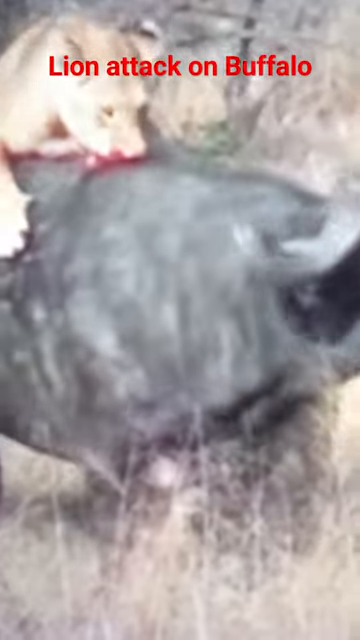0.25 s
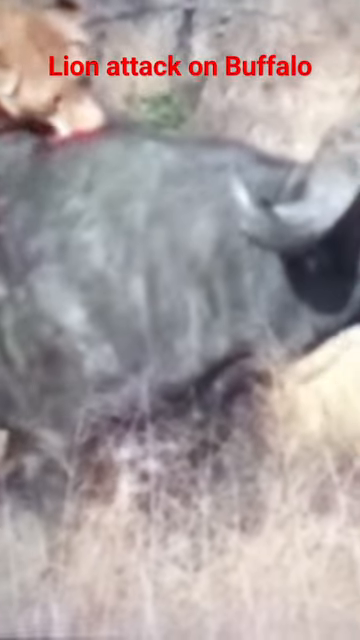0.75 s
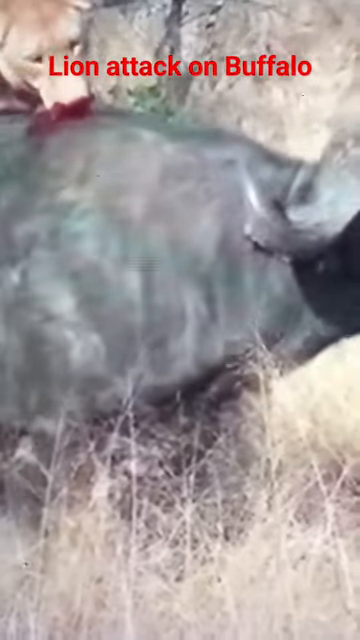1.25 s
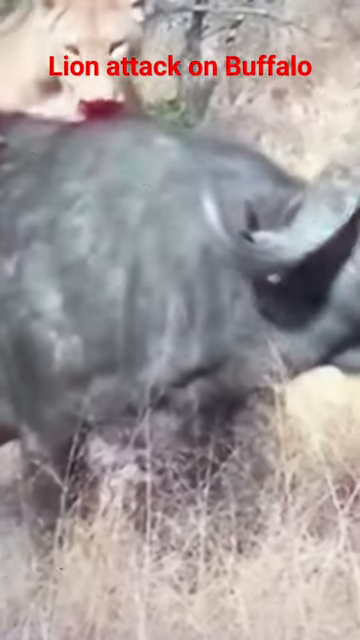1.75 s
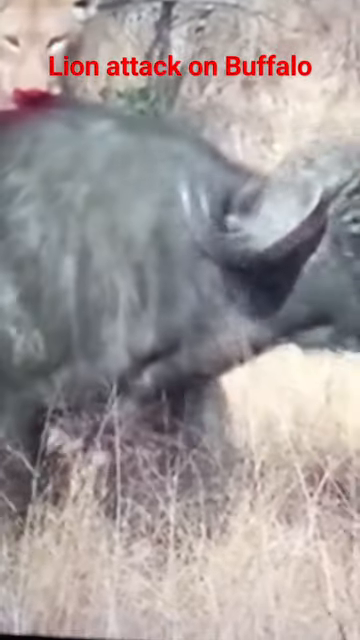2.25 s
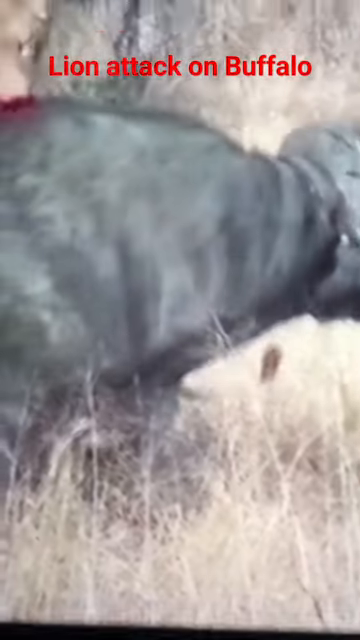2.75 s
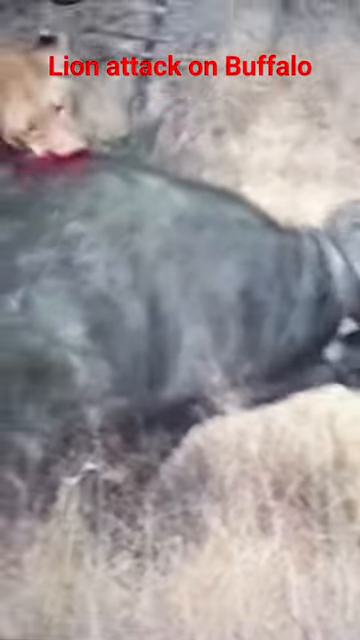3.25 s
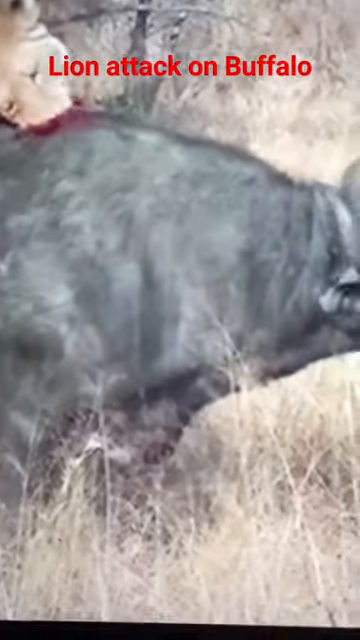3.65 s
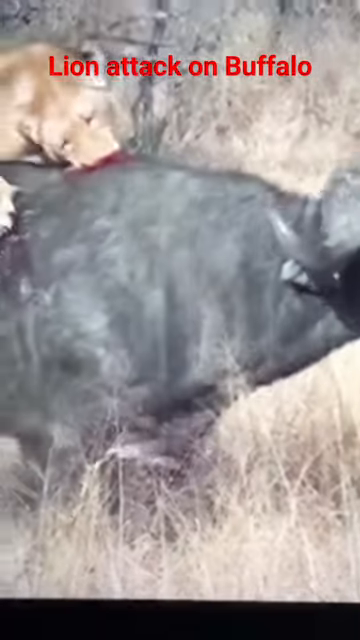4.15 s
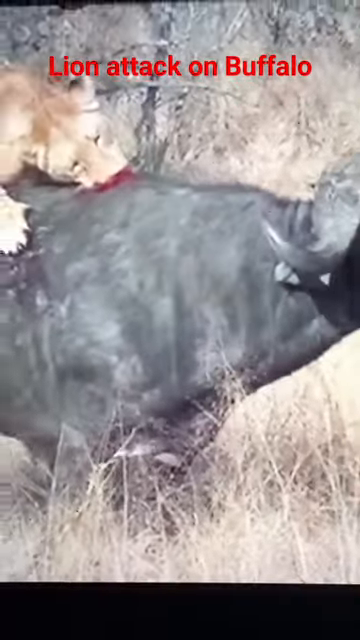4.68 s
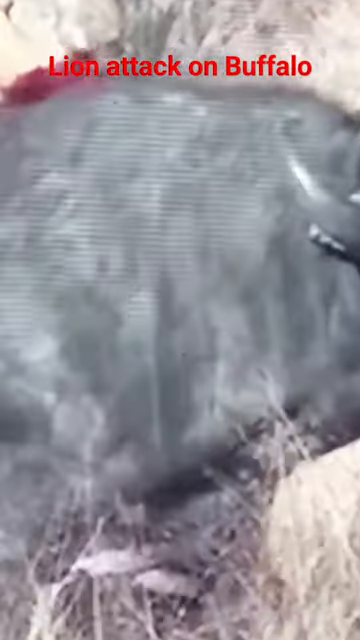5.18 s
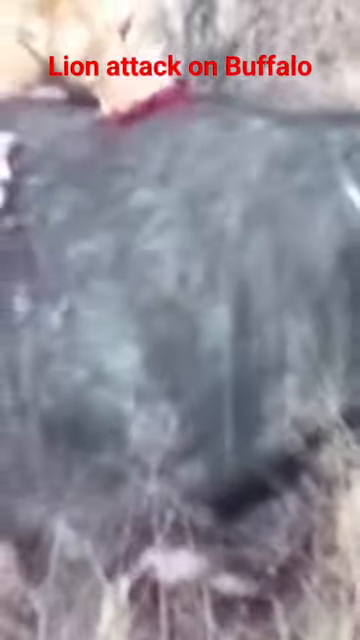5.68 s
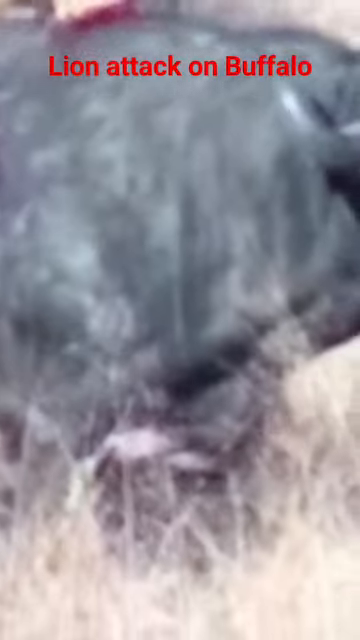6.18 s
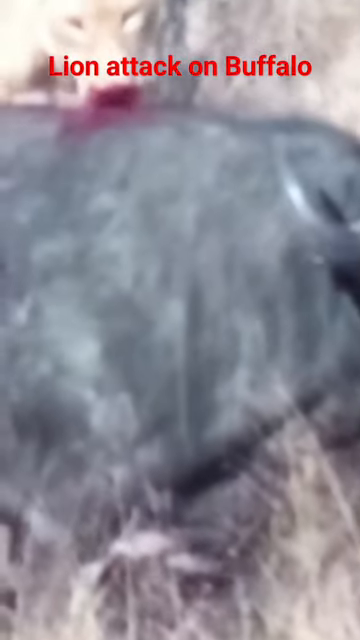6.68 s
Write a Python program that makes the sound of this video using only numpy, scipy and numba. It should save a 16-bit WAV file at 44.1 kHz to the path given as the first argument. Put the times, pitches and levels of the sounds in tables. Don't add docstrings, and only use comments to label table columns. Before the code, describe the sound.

A buffalo bellows twice in hoarse, guttural distress, each call ending in a gasp, with camera shutters rattling, creaks, a snort and rustling dry grass.

```python
import sys
import numpy as np
from scipy import signal
from scipy.fft import rfft, irfft
from scipy.io import wavfile
from scipy.ndimage import uniform_filter1d
from numba import njit

SR = 44100
rng = np.random.default_rng(int(sys.argv[2]) if len(sys.argv) > 2 else 0)


def log_audio(samples):
    frames = np.atleast_2d(samples).T
    limited = np.clip(frames, -1, 1)
    pcm = np.round(limited * 32767).astype(np.int16)
    wavfile.write(sys.argv[1], SR, pcm)


def nominal_scale(level):
    x = np.asarray(level, float) / 20
    return 10 ** x


N = 305524


def seconds():
    return np.arange(N) / SR


def rms_one(x):
    return x / np.sqrt(np.mean(x ** 2) + 1e-20)


def in_time(rows, outside=None):
    s, *columns = np.transpose(rows)
    return [np.interp(seconds(), s, c, outside, outside) for c in columns]


def spans_db(tables):
    return sum(nominal_scale(in_time(rows, outside=-200)[0]) for rows in tables)


def bells(rows):
    return [np.exp(-((seconds() - s) / width) ** 2) for s, width, *_ in rows]


def drift(rate):
    r = np.exp(-2 * np.pi * rate / SR)
    return rms_one(signal.lfilter([1], [1, -2 * r, r * r], rng.standard_normal(N + SR))[SR:])


@njit
def resonate(x, hz, r, sr):
    out = np.zeros(len(x))
    for i in range(2, len(x)):
        driven = (1 - r * r) / 2 * (x[i] - x[i - 2])
        out[i] = driven + 2 * r * np.cos(2 * np.pi * hz[i] / sr) * out[i - 1] - r * r * out[i - 2]
    return out


def bands(x, modes, order=1):
    out = 0
    for k, (hz, width, db) in enumerate(modes):
        rung = x + 1e-18
        for _ in range(order):
            rung = resonate(rung, hz + np.zeros(N), np.exp(-np.pi * width / SR), SR)
        out = out + (-1) ** k * nominal_scale(db) * rung
    return out


def shaped_noise(spectrum):
    hz, db = np.transpose(spectrum)
    grid = np.log(np.arange(1, N // 2 + 2) * SR / N)
    gain = nominal_scale(np.interp(grid, np.log(hz), db, -90, -90))
    return rms_one(irfft(rfft(rng.standard_normal(N)) * gain, N))


def steep(x, kind, hz, order=4):
    return signal.sosfilt(signal.butter(order, hz, kind, fs=SR, output="sos"), x)


# f/Hz, width/Hz, level/dB
RUSTLE_BANDS = [(670, 530, 2.5), (1270, 290, -14), (1500, 850, -8.5), (2367, 600, 7), (2790, 900, -1),
                (3350, 610, -0.5), (3910, 500, -0.5), (4580, 560, -20.5), (5400, 440, -19.5),
                (6500, 240, -60.5), (7170, 1700, -40.5), (8360, 280, -37.5)]
# f/Hz, width/Hz, level/dB
BRUSH_BANDS = [(5220, 880, 7), (7740, 2000, -7.5)]
# f/Hz, level/dB per Hz
ROOM_HUM = [(21, -32.5), (36, -20), (65, -14), (172, -3.5), (205, -5.5), (231, -11), (401, -20.5),
            (429, -28.5), (463, -9), (500, -26), (650, -43.5), (1100, -120)]
# f/Hz, level/dB per Hz
HISS = [(250, 0.5), (1000, 10), (3000, -7.5), (6000, -30), (10000, -22), (15000, -29), (16000, -31)]
# centre t/s, width t/s, rustle rise level/dB, brushing rise level/dB
STIRS = [
    (2.08, 0.13, 5, 7),
    (2.5, 0.24, 9.5, 8),
    (6.2, 0.38, 5.5, 9),
    (6.6, 0.44, 2.5, 3.5),
    (6.95, 0.23, 7.5, 9),
]
RUSTLE_DB, BRUSH_DB, HUM_DB, HISS_DB = -40.5, -67.5, -58, -56.5
RUSTLE_SHIFT_DB, HUM_SHIFT_DB, SHIFT_S = 3, -3, .1


def background():
    rustle = rms_one(bands(rng.standard_normal(N) * nominal_scale(2.0 * drift(17)), RUSTLE_BANDS, order=2))
    brush = rms_one(bands(rng.standard_normal(N) * nominal_scale(2.7 * drift(23)), BRUSH_BANDS, order=2))
    hum = steep(shaped_noise(ROOM_HUM), "high", 30, order=6) * nominal_scale(0.35 * drift(16))
    rustle_db, brush_db = sum(np.outer(db, bell) for (_, _, *db), bell in zip(STIRS, bells(STIRS)))
    calling = uniform_filter1d(1. * (spans_db(EFFORT) > 1e-6), int(SHIFT_S * SR))
    out = nominal_scale(RUSTLE_DB - 10.0 + rustle_db + RUSTLE_SHIFT_DB * calling) * rustle
    out += nominal_scale(BRUSH_DB + brush_db) * brush
    out += nominal_scale(HUM_DB + HUM_SHIFT_DB * calling) * hum
    return out + nominal_scale(HISS_DB) * shaped_noise(HISS)


# t/s, length t/s, start f/Hz, end f/Hz, level/dB
CHIRPS = [
    (5.63, .05, 7200, 6500, -72),
    (6.685, .05, 6600, 6750, -63),
    (6.73, .045, 5450, 5050, -52),
]


def chirps():
    out = np.zeros(N)
    for s, length, start_hz, end_hz, db in CHIRPS:
        size = int(length * SR)
        glide = np.cumsum(np.linspace(start_hz, end_hz, size)) / SR
        out[round(s * SR):][:size] += nominal_scale(db) * np.hanning(size) * np.sin(2 * np.pi * glide)
    return out


# t/s, peak level/dB
SHUTTERS = [
    [(2.228, -32.5), (2.263, -34.5), (2.275, -34), (2.301, -29), (2.321, -29.5), (2.352, -31), (2.376, -36),
     (2.409, -29.5), (2.426, -46)],
    [(5.876, -31), (5.905, -32), (5.92, -32.5), (5.948, -25.5), (5.966, -33), (6.002, -27.5),
     (6.025, -32.5), (6.058, -26.5), (6.078, -28.5), (6.108, -29), (6.122, -40), (6.151, -25.5),
     (6.167, -31), (6.201, -27), (6.259, -27.5)],
    [(3.132, -41), (3.203, -39.5), (3.257, -42), (4.284, -39), (4.357, -40), (4.41, -39), (4.465, -46)],
]
# t/s, peak level/dB
SMACKS = [
    (2.6136, -36),
    (2.676, -44),
    (2.71, -42),
    (2.721, -43),
    (2.802, -57),
    (5.081, -45),
    (5.099, -40.5),
    (5.12, -61),
]
# f/Hz, width/Hz, level/dB
SNAP_EDGE = [(4220, 450, -6), (5420, 1030, -1), (6570, 640, -24), (7490, 1060, -10), (9270, 910, -38)]
# f/Hz, width/Hz, level/dB
SNAP_BODY = [(736, 245, 7.5), (1474, 420, 3.5), (2140, 550, 10), (2870, 580, 9)]
SHUTTER_BODY_DB, SHUTTER_MS = (11, 6, -9), 3.48
SMACK_BODY_DB, SMACK_MS = 27, 3.2


def snaps():
    edge, body, t = np.zeros(N), np.zeros(N), np.arange(SR // 20) / SR
    rows = [(*snap, body_db, SHUTTER_MS) for burst, body_db in zip(SHUTTERS, SHUTTER_BODY_DB) for snap in burst]
    rows += [(*smack, SMACK_BODY_DB, SMACK_MS) for smack in SMACKS]
    for s, db, body_db, ms in rows:
        shape = nominal_scale(db - 3) * (1 - np.exp(-t / .002)) * np.exp(-t * 1000 / ms)
        i = round((s + .001) * SR)
        edge[i:i + len(t)] += shape
        body[i:i + len(t)] += shape * nominal_scale(body_db)
    out = 0
    for envelope, modes in ((edge, SNAP_EDGE), (body, SNAP_BODY)):
        noise = rng.standard_normal(N)
        unit = np.std(bands(noise, modes, order=2))
        out = out + bands(envelope * noise, modes, order=2) / unit
    return out


# thump level/dB, f/Hz, width/Hz, tick level/dB
KNOCK = (-18, 520, 86, -35)
KNOCK_S = 2.691


def knock():
    thump_db, hz, width, tick_db = KNOCK
    t = np.maximum(seconds() - KNOCK_S, 0)
    thump = nominal_scale(thump_db) * np.sin(2 * np.pi * hz * t) * np.exp(-np.pi * width * t)
    tick = nominal_scale(tick_db) * (t > 0) * np.exp(-t / 0.00051) * rng.standard_normal(N)
    return steep(thump, "high", 170, order=2) + steep(tick, "band", (3800, 9000), order=3)


# start t/s, swell t/s, hold t/s, level/dB, throat resonance f/Hz
GASPS = [
    (1.348, 0.061, 0.16, -32, 1035),
    (2.454, 0.081, 0.16, -40, 1144),
    (4.995, 0.13, 0.12, -29.5, 936),
]
# start t/s, swell t/s, hold t/s, level/dB, throat resonance f/Hz
SNORT = (6.232, .025, .11, -29.5, 870)
# f/Hz, width/Hz, level/dB
GASP_CHEST = [(656, 590, -13.5), (1263, 470, -16)]
GASP_MOUTH = [(277, 87, -8), (1712, 160, -2.5), (2086, 225, 1), (2540, 730, -3.5), (3190, 190, -3),
              (3650, 420, -3), (4320, 320, -15.5), (5170, 280, -20.5)]
GASP_NOSE = [(8030, 1200, 13.5), (9100, 710, 0), (9900, 1300, 3)]
GASP_FADE_DB_PER_S, SNORT_FADE_DB_PER_S, SNORT_HISS_DB = 205, 95, -12
SWELL_DB, GASP_THROAT_WIDTH_HZ, THROAT_SAG_HZ_PER_S = 13.5, 256, 325
MOUTH_HISS_DB, MOUTH_DULLS_DB_PER_S, NOSE_HISS_DB, NOSE_DULLS_DB_PER_S = 3, 49.5, -23.5, 70


def gasps():
    air = rng.standard_normal((3, N)) * nominal_scale(2.44 * drift(70) + 0.82 * drift(360))
    rows = [(*gasp, GASP_FADE_DB_PER_S, 0) for gasp in GASPS]
    rows += [(*SNORT, SNORT_FADE_DB_PER_S, SNORT_HISS_DB)]
    gains, centre_hz = np.zeros((3, N)), np.full(N, 1000.)
    for start, swell, hold, db, hz, fade, hiss_db in rows:
        t = seconds() - start
        age = np.clip(t, 0, swell + hold)
        rise_db = SWELL_DB * np.maximum(1 - t / swell, 0)
        gain = (t > 0) * nominal_scale(db - rise_db - fade * (t - age) * (t > 0))
        mouth_db = hiss_db + MOUTH_HISS_DB - MOUTH_DULLS_DB_PER_S * age
        nose_db = hiss_db + NOSE_HISS_DB - NOSE_DULLS_DB_PER_S * age
        gains += gain * nominal_scale([0 * t, mouth_db, nose_db])
        centre_hz = np.where(t > 0, hz - THROAT_SAG_HZ_PER_S * age, centre_hz)
    chest_bands = [GASP_CHEST[0], (centre_hz, GASP_THROAT_WIDTH_HZ, 0), GASP_CHEST[1]]
    modes = (chest_bands, GASP_MOUTH, GASP_NOSE)
    chest, hiss, nose = (rms_one(bands(a, m, order=2)) for a, m in zip(air, modes))
    return gains[0] * chest + gains[1] * hiss + gains[2] * steep(nose, "high", 5700)


# from t/s, until t/s, time constant t/s, air level/dB, long-short alternation/0-1
HOARSENING = [
    (.575, 1.5, .03, -14, .016),
    (2.78, 5.2, .35, -10, .011),
]
CLEAR_AIR_DB, CLEAR_JITTER, JITTER_FOLLOWS = -21, .003, .6
FLUTTER_S, FLUTTER_WIDTH_S, FLUTTER = 4.66, .15, .035


def folds():
    t, air_db = seconds(), np.full(N, float(CLEAR_AIR_DB))
    alternate = FLUTTER * np.exp(-((t - FLUTTER_S) / FLUTTER_WIDTH_S) ** 4)
    for start, end, settle, db, depth in HOARSENING:
        hoarse = (1 - np.exp(-np.maximum(t - start, 0) / settle)) * (t < end)
        air_db += (db - CLEAR_AIR_DB) * hoarse
        alternate += depth * hoarse
    return alternate, CLEAR_JITTER * nominal_scale(JITTER_FOLLOWS * (air_db - CLEAR_AIR_DB)), air_db


# t/s, slap rate f/Hz
FIRST_RATE = [(0.212, 84.13), (0.414, 79.2), (0.564, 78.23), (0.698, 78.91), (0.827, 75.57), (0.954, 72.41),
              (1.083, 68.94), (1.212, 66.78), (1.36, 54.55)]
SECOND_RATE = [(2.74, 39.92), (2.803, 59.81), (2.985, 73.57), (3.348, 77.68), (3.494, 74.76),
               (3.997, 76.05), (4.181, 74.4), (4.587, 74.15), (5.04, 69.26)]
FIRST_WAIT, SECOND_WAIT = .46, .18


def slaps():
    alternate, jitter, _ = folds()
    out = np.zeros(N)
    for rows, wait in ((FIRST_RATE, FIRST_WAIT), (SECOND_RATE, SECOND_WAIT)):
        rate, = in_time(rows, outside=0)
        at = np.flatnonzero(np.diff(np.floor(np.cumsum(rate) / SR + 1 - wait)))
        late, strong = rng.standard_normal((2, len(at)))
        uneven = alternate[at] * (-1.) ** np.arange(len(at))
        shift = (uneven + jitter[at] * late) * SR / rate[at]
        out[at + shift.astype(int)] = -nominal_scale(30. * uneven + 30. * jitter[at] * strong)
    return out


# t/s, jaw f/Hz, tongue f/Hz, palate f/Hz, pressing level/dB
MOUTH = [
    [(.2, 516, 2015, 2870, -11.5), (.45, 492, 1971, 2540, -14.5), (.75, 513, 2010, 2840, -10.5),
     (1.13, 521, 2040, 3100, -2), (1.36, 507, 2090, 3140, -12.5)],
    [(2.64, 617, 1920, 2920, -1.5), (2.82, 575, 1870, 2740, -9), (3.02, 587, 1940, 2540, -4.5),
     (3.25, 547, 1830, 2770, -9.5), (3.449, 456, 1820, 2840, -14.5), (3.999, 485, 1930, 2784, -16.5),
     (4.35, 515, 1993, 2765, -8), (4.7, 495, 1980, 2900, -7), (5.06, 515, 2004, 2960, -6)],
]
# t/s, f/Hz
LIPS = [(.2, 3460), (.45, 3600), (.7, 3580), (.95, 3840), (1.36, 3770), (2.7, 3650), (3.4, 3790),
        (4.4, 3803), (5.05, 3390)]
MOUTH_WIDTHS_HZ = (45, 164, 66, 410)
LIPS_WIDTH_HZ, LIPS_DB = 245, -5.5
REST_JAW_HZ, REST_TONGUE_HZ = 500, 1900
GAPE_HZ, GAPE_PER_JAW, GAPE_DB, GAPE_DB_PER_HZ, GAPE_PRESS = 1587, 1.32, -15, 0.1455, 0.12
TONGUE_DB, TONGUE_DB_PER_HZ, TONGUE_JAW_DB_PER_HZ, TONGUE_PRESS = -4, 0.0453, -.2, 0.59
PALATE_DB, PALATE_PRESS, PALATE_AIR = -8.5, 0.53, 0.41


def mouth():
    jaw, tongue, palate, press_db = in_time(np.vstack(MOUTH))
    rasp_db = in_time(np.vstack(PHARYNX))[-1]
    opened = jaw - REST_JAW_HZ
    gape_db = GAPE_DB + GAPE_DB_PER_HZ * opened + GAPE_PRESS * press_db
    tongue_db = TONGUE_DB + TONGUE_DB_PER_HZ * (tongue - REST_TONGUE_HZ)
    tongue_db += TONGUE_JAW_DB_PER_HZ * opened + TONGUE_PRESS * press_db
    palate_db = PALATE_DB + rasp_db + PALATE_PRESS * press_db + PALATE_AIR * folds()[2]
    hz = (jaw, GAPE_HZ + GAPE_PER_JAW * opened, tongue, palate, in_time(LIPS)[0])
    db = (press_db, gape_db, tongue_db, palate_db, palate_db + LIPS_DB)
    return list(zip(hz, (*MOUTH_WIDTHS_HZ, LIPS_WIDTH_HZ), db))


# f/Hz, width/Hz, level/dB
THROAT = [(893, 58, -3.5), (1150, 72, 0), (1375, 78, -3)]
# f/Hz, width/Hz, level/dB
THROAT_TOP = [(4260, 330, -36), (5600, 560, -48), (6380, 220, -56.5), (7500, 1000, -61.5)]
# f/Hz, width/Hz, level/dB
CHEST = [(286.5, 109, -19.5), (228.7, 41, -24.5)]
# f/Hz, width/Hz, level/dB
SLAP_RING = (1200, 520, -14)
# t/s, middle throat f/Hz, its level/dB, top throat f/Hz, rasp level/dB
PHARYNX = [
    [(.2, 1140, 2.5, 1356, -2.5), (.6, 1144, -1.5, 1355, 1), (1.0, 1171, 0, 1347, 0),
     (1.36, 1155, -3, 1330, 7.5)],
    [(2.64, 1180, -2.5, 1695, 4.5), (2.8, 1230, 1, 1597, 1.5), (2.95, 1203, 3, 1500, 6.5),
     (3.1, 1135, 1.5, 1505, 1), (3.3, 1146, 3, 1430, 1), (3.45, 1143, 0.5, 1353, -0.5),
     (3.9, 1140, 1.5, 1380, 6), (4.9, 1138, -1.5, 1362, -2), (5.06, 1080, -10, 1290, 1)],
]
# centre t/s, width t/s, rise level/dB
GROANS = [
    (.85, .15, 7.5),
    (3.351, .2, 8),
    (5.02, .08, 14.5),
]
AIR_LOW_DB, AIR_TOP_DB = -24, -16
CHEEK_HZ, CHEEK_WIDTH_HZ, CHEEK_DB = 2497, 170, -5
THROAT_DB_PER_HZ = 0.04
WAVER_DB, WAVER_PER_S = 2.5, 5.0
BRIGHT_LAG_S, BRIGHT_SCATTER_DB = .0012, 1.8
NASAL_HZ, NASAL_WIDTH_HZ, NASAL_OPENS_HZ, NASAL_SPAN_HZ = 2000, 690, 2002, 70


def throat(slap, air=0):
    jaw, gape, tongue, palate, lips = mouth()
    middle_hz, middle_db, top_hz, _ = in_time(np.vstack(PHARYNX))
    middle = (middle_hz, THROAT[1][1], middle_db)
    _, top_width, top_db = THROAT[-1]
    top = (top_hz, top_width, top_db + THROAT_DB_PER_HZ * np.maximum(jaw[0] - REST_JAW_HZ, 0))
    groan_db = sum(rise_db * bell for (*_, rise_db), bell in zip(GROANS, bells(GROANS)))
    chest = [CHEST[0], (*CHEST[1][:2], CHEST[1][2] + groan_db)]
    cheek = (CHEEK_HZ, CHEEK_WIDTH_HZ, palate[2] + CHEEK_DB)
    upper = [(hz, width, db + WAVER_DB * drift(WAVER_PER_S)) for hz, width, db in (cheek, palate, lips)]
    deep = slap + nominal_scale(AIR_LOW_DB) * air
    bright = (slap + nominal_scale(AIR_TOP_DB) * air) * nominal_scale(BRIGHT_SCATTER_DB * drift(40))
    bright = np.roll(bright, round(BRIGHT_LAG_S * SR))
    low = bands(deep, chest + [jaw]) - bands(deep, [THROAT[0], middle, top])
    low += bands(deep, [SLAP_RING], order=2) - bands(deep, [gape, tongue])
    low = steep(steep(low, "high", 240, order=2), "low", 1990, order=3)
    voice = -low - bands(bright, upper + THROAT_TOP, order=2)
    nasal = np.clip((NASAL_OPENS_HZ - tongue[0]) / NASAL_SPAN_HZ, 0, 1)
    return voice - nasal * bands(voice, [(NASAL_HZ, NASAL_WIDTH_HZ, 0)])


# t/s, peak level/dB
CREAKS = [(1.372, -13), (1.43, -8), (2.323, -18.5), (2.392, -16.5), (2.461, -20.5), (2.522, -20.5),
          (2.587, -13.5), (2.643, -7), (2.676, -11), (2.701, -4), (2.709, -4.5), (2.719, -24),
          (5.057, -5.5)]


def creaks():
    clicks = np.zeros(N)
    for s, db in CREAKS:
        clicks[round(s * SR)] = -nominal_scale(db + 26.0)
    return throat(clicks)


# t/s, level/dB
EFFORT = [
    [(.2, -26), (.43, -26), (.8, -26.5), (1.1, -27.5), (1.3, -27.5), (1.365, -31.5)],
    [(2.74, -27), (2.96, -25), (3.3, -24), (3.7, -24.5), (4.0, -24.5), (4.5, -26.5), (4.9, -28),
     (5.045, -30.5)],
]


def bellows():
    effort = spans_db(EFFORT)
    pulses = slaps()
    hold = np.exp(-1 / (.0011 * SR))
    puff = signal.lfilter([.075], [1, -2 * hold, hold ** 2], np.abs(pulses))
    puff += .015 * (effort > 1e-6)
    voice = throat(pulses, nominal_scale(folds()[2]) * puff * rng.standard_normal(N))
    loudness = np.sqrt(uniform_filter1d(voice ** 2, size=SR // 12) + 1e-12)
    return voice / loudness * uniform_filter1d(effort, size=SR // 100)


ROOM_T60_S, ROOM_DB, ROOM_CUT_HZ = 0.2, -16, 2800


def room(x):
    t = np.arange(SR // 3) / SR
    tail = steep(rng.standard_normal(len(t)), "low", ROOM_CUT_HZ, order=1)
    tail *= nominal_scale(-60 * t / ROOM_T60_S) * (t > .004)
    return signal.fftconvolve(x, tail / np.sqrt(np.sum(tail ** 2)))[:N]


# centre t/s, width t/s, slide f/Hz
LEANS = [
    (2.34, 0.07, -1150),
    (6.05, 0.31, -1100),
]
HOLLOW_HZ, HOLLOW_WIDTH_HZ = 4530, 860


def hollow(x):
    lean = bells(LEANS)
    hz = HOLLOW_HZ + sum(slide_hz * bell for (*_, slide_hz), bell in zip(LEANS, lean))
    return x - np.sqrt(np.minimum(sum(lean), 1)) * bands(x, [(hz, HOLLOW_WIDTH_HZ, 0)])


def scene():
    played = steep(chirps() + snaps() + gasps() + creaks() + bellows(), "low", 10200, order=3)
    heard = played + nominal_scale(ROOM_DB) * room(played) + background()
    return (hollow(heard) + knock())[None]


def roll_off(x):
    return signal.sosfilt(signal.butter(12, 15660, fs=SR, output="sos"), x)


FADE_FROM_S, FADE_S = .206, .23


def record(dry):
    fade = np.clip((seconds() - FADE_FROM_S) / FADE_S, 0, 1)
    return roll_off(dry * fade)


dry = scene()
out = record(dry)
log_audio(out)
```